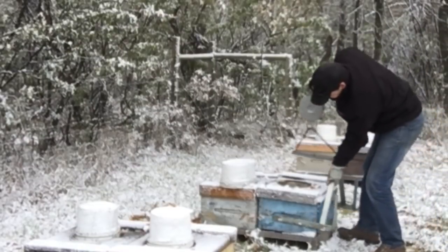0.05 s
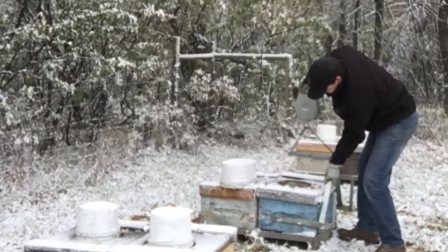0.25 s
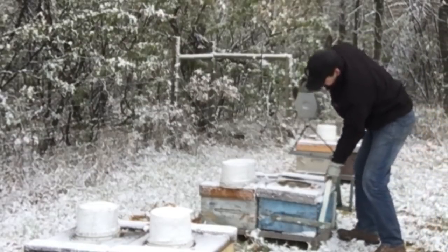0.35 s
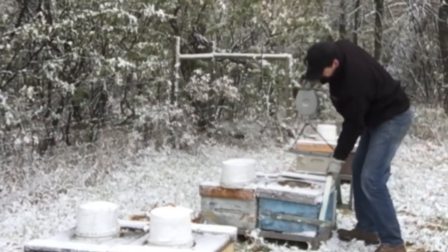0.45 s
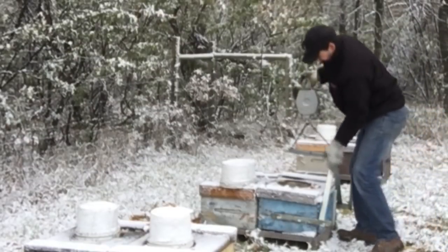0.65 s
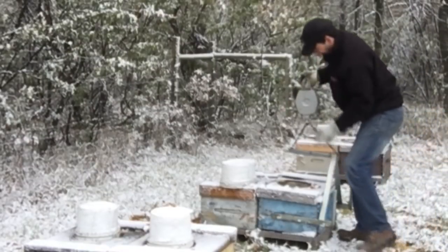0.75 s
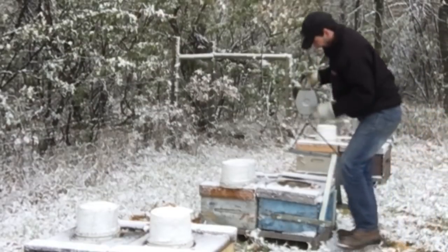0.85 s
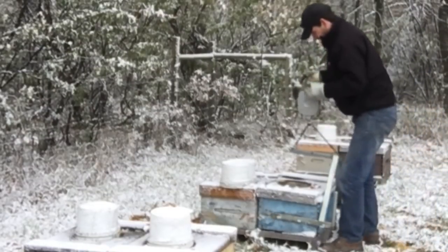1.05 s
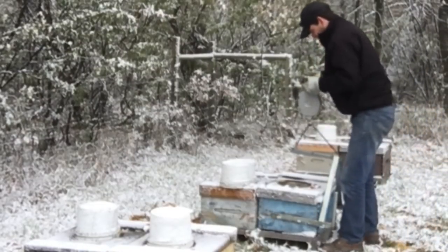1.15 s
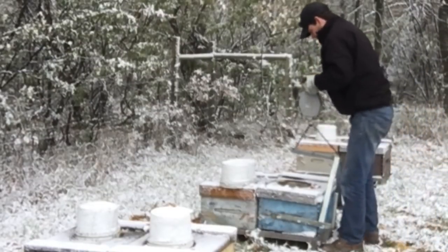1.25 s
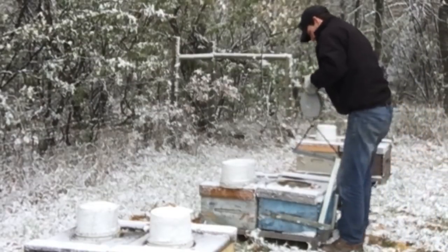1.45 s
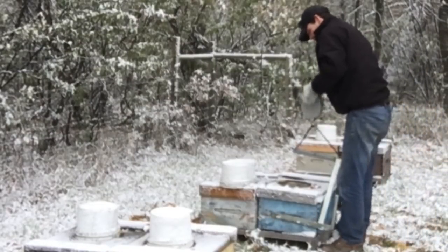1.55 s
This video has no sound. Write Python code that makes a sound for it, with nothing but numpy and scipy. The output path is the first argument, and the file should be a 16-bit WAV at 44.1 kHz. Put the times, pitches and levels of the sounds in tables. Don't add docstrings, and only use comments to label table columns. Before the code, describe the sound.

Bright, short steel clanks come in clusters during the first part, with a scraping hook and hollow knocks, then fade into boot thuds, faint scuffs and jacket rustle over a low, quiet outdoor floor, mono microphone.

```python
import sys
import numpy as np
from scipy import signal
from scipy.io import wavfile

SR = 44100
rng = np.random.default_rng(int(sys.argv[2]) if len(sys.argv) > 2 else 0)


def makeup_ratio(level_db):
    decades = np.asarray(level_db, float) / 20
    return 10 ** decades


def wav_record(signal):
    frames = np.transpose(np.atleast_2d(signal))
    bounded = np.clip(frames, -1, 1)
    quanta = np.round(bounded * 32767).astype(np.int16)
    wavfile.write(sys.argv[1], SR, quanta)


N = 70560
T = np.arange(N) / SR


def at_hz(points, hz):
    point_hz, level_db = np.transpose(points)
    return np.interp(np.log(hz), np.log(point_hz), level_db)


def in_time(rows):
    return np.interp(T, *np.transpose(rows))


def rms_one(x):
    return x / np.sqrt(np.mean(x ** 2) + 1e-20)


def band_pass(x, low_hz, high_hz):
    return signal.sosfilt(signal.butter(2, [low_hz, high_hz], "band", fs=SR, output="sos"), x)


def high_pass(x, order, hz):
    return signal.sosfilt(signal.butter(order, hz, "high", fs=SR, output="sos"), x)


def drift(rate):
    r = np.exp(-2 * np.pi * rate / SR)
    noise = rng.standard_normal(N + SR)
    return rms_one(signal.lfilter([1], [1, -2 * r, r * r], noise)[SR:])


def ring(clicks, hz, t60):
    r = makeup_ratio(-60 / (t60 * SR))
    w = 2 * np.pi * hz / SR
    return signal.lfilter([0, np.sin(w)], [1, -2 * r * np.cos(w), r * r], clicks + 1e-18)


def struck(clicks, hz, t60):
    rise = 4.1 / hz
    return 2 * (1 - makeup_ratio(-60 / (rise * SR))) * ring(ring(clicks, hz, rise), hz, t60)


def bands():
    edges = 25 * 2 ** np.arange(0, 9.7, .4)
    return [(np.sqrt(low * high), signal.butter(2, [low, high], "band", fs=SR, output="sos"))
            for low, high in zip(edges, edges[1:])]


def coloured(spectrum, patchy_db, rate):
    white = rng.standard_normal((2, N + SR))
    together = drift(rate / 4)
    total = np.zeros(N)
    for k, (hz, sos) in enumerate(bands()):
        flicker_db = patchy_db * (0.87 * together + drift(rate))
        total += makeup_ratio(at_hz(spectrum, hz) + flicker_db) * signal.sosfilt(sos, white[k % 2])[SR:]
    return rms_one(total)


def crowd(modes, count=3):
    hz, db, t60 = np.transpose(modes)
    off = np.linspace(-1, 1, count)[:, None] + 0.366 * rng.standard_normal((count, len(hz)))
    all_hz = np.append(hz, hz * (1 + 0.045 * off))
    all_db = np.append(db, np.tile(db, count))
    all_t60 = np.append(t60, np.tile(0.28 * t60, count))
    return np.array([all_hz, all_db, all_t60])[:, np.argsort(all_hz)]


def contacts(s, db, length, per_mode_db, count=6):
    first_touch_db, strike_spread_db = 3.5, 3.5
    later = np.arange(count).clip(0, 1)
    when = (np.arange(count) + (rng.random((len(s), count)) - .5) * later) / count
    at = ((s[:, None] + when * length[:, None]) * SR).astype(int)
    luck = rng.standard_normal((len(s), count, len(per_mode_db)))
    trains = np.zeros((len(per_mode_db), N))
    for k, train in enumerate(trains):
        level_db = (db + per_mode_db[k])[:, None] - first_touch_db * later - 7.5 * when
        level_db = level_db + strike_spread_db * luck[:, :, k] * (1 + later) / 2
        np.add.at(train, at, makeup_ratio(level_db) * np.sign(luck[:, :, k - 1]))
    return trains


# (time [s], level [dB], loudest pitch [Hz], contact length [s], focus [dB per octave])
CLANKS = [(.0013, -20, 3500, 0.0039, 9), (.005, -35, 4640, .01, 12), (.0185, -62, 3400, 0.0072, 27),
          (0.033, -55, 3500, .005, 51), (.0462, -29.5, 4200, 0.0028, 7.5), (.1035, -63, 3560, 0.0093, 15),
          (.2212, -38.5, 5460, 0.0038, 4.5), (0.2262, -22, 3300, .003, 4.5), (0.2293, -43, 11800, .003, 1),
          (.2306, -6, 4600, .0015, 8), (.232, -18, 4800, 0.0044, 9), (0.235, -13, 4300, .007, 10),
          (0.2588, -18, 3920, .0064, 10), (.266, -28.5, 4970, 0.0073, 14.5),
          (0.274, -23, 4650, 0.003, 10.5), (0.278, -31, 3600, 0.0045, 12), (.4491, -13.5, 4760, .001, 10),
          (.4505, -15, 5030, .005, 18), (0.459, -27, 3040, 0.0052, 18), (.5049, -25, 4400, .0012, 6),
          (0.507, -30, 4730, .006, 12.5), (.517, -29.5, 2900, 0.0024, 26), (0.5366, -35.5, 3300, .004, 9),
          (0.543, -46, 7000, .003, 15), (.5817, -33, 3200, .003, 11), (.588, -40, 2980, .002, 7),
          (0.704, -52, 7500, 0.0024, 26.5), (0.723, -45, 4200, .004, 11), (.730, -47.5, 3100, 0.0049, 18),
          (1, -50, 11000, .008, 8.5), (1.082, -46, 4500, .004, 10), (1.311, -50.5, 3050, 0.0048, 11.5)]
# (pitch [Hz], level [dB], t60 [s])
STEEL = [(2716, -9, 0.047), (2890, -2, .02), (3196, -3, .021), (3500, 4, 0.013), (4246, 0.5, .018),
         (4640, -1.5, 0.026), (5277, 0.5, 0.017), (5800, 0.5, .016), (7250, -8, .03), (8000, -8, .02),
         (8800, -4, .012), (11800, -17.5, 0.012), (14400, -16, .015), (15300, -16.5, .015)]
# (time [s], level [dB])
DRAG = [
    (.449, -70),
    (.455, -34),
    (.493, -42),
    (0.498, -34),
    (.52, -37),
    (0.551, -43.5),
    (.572, -52),
    (0.589, -60),
    (0.639, -89.5),
]


def steel():
    s, db, focus_hz, length, focus = np.transpose(CLANKS)
    hz, level_db, t60 = crowd(STEEL)
    away = np.abs(np.log2(hz[:, None] / focus_hz))
    trains = contacts(s, db - 14.5, length, level_db[:, None] - focus * away, count=9)

    slips_per_s, drag_focus_hz = 2500, 4200
    slip_db = in_time(DRAG) + 2 * np.minimum(rng.exponential(1, N), 4.0) - 15.0
    slips = (rng.random(N) < slips_per_s / SR) * makeup_ratio(slip_db)
    slips = slips * ((T > DRAG[0][0]) & (T < DRAG[-1][0]))
    signs = rng.standard_normal((4, N))
    drag_db = level_db - 10 * np.abs(np.log2(hz / drag_focus_hz))

    out = np.zeros(N)
    for k in range(len(hz)):
        clicks = trains[k] + slips * signs[k % 4] * makeup_ratio(drag_db[k])
        out += struck(clicks, hz[k], t60[k])
    return out


# (level [dB], pitch [Hz], length [s])
GRIPPED = [(-32.5, 4450, 0.016), (-42.5, 3450, 0.0032), (-30, 4190, 0.0045), (-22, 3520, 0.0032),
           (-14, 5500, .004), (-16, 3540, 0.0057), (-25.5, 4760, 0.0087), (-22, 5700, 0.006),
           (-22.5, 2880, 0.0023), (-39.5, 1150, 0.0063), (-36.5, 1080, 0.0048), (-35.5, 1050, 0.0073),
           (-43.5, 1150, 0.0051), (-51, 6000, 0.0026)]
GRIPPED_S = [.002, .0185, .0464, .2268, .2312, .2582, .2605, .4495, .4492, .5765, .6528, .662, .676, .7035]


def gripped():
    grip_s, sag_db = .0007, 4
    out = np.zeros(N)
    for s, (db, hz, length) in zip(GRIPPED_S, GRIPPED):
        swell = np.clip((T - s) / grip_s, 0, 1)
        stop = np.clip((s + length - T) / grip_s + 1, 0, 1)
        level = makeup_ratio(db - sag_db * np.clip((T - s) / length, 0, 2))
        out += level * swell * stop * np.sin(2 * np.pi * (hz * T + rng.random()))
    return out


# (level [dB], loudest pitch [Hz], contact length [s], focus [dB per octave])
KNOCKS = [(-38.5, 910, 0.02, 3), (-45, 740, 0.0028, 3.5), (-25.5, 850, .0044, 1.5),
          (-23.5, 930, 0.00442, 10), (-27.5, 830, 0.013, 13), (-31.5, 500, 0.008, 0),
          (-27.5, 2400, .0028, 1), (-34.5, 2700, 0.0032, 5.5), (-27, 1500, 0.00298, 5),
          (-39, 4000, 0.0051, -0.5), (-40, 1600, 0.00368, 3), (-42.5, 2000, 0.00293, 3),
          (-53, 1100, 0.00358, 14), (-50, 1670, 0.0028, 8)]
KNOCK_S = [.002, .063, .2293, .4488, .500, .536, .5764, .583, .6527, .659, .6635, .6765, .692, .709]
# (pitch [Hz], level [dB], t60 [s])
HOUSING = [(630, -5, .025), (800, -5, .02), (1000, -2, .04), (1190, -2, .03), (1660, -8, .02),
           (2050, -7, .018), (2570, -5, .02), (3080, -5, .02), (3390, -6, .02), (4370, -10, .018),
           (5200, -12, .015), (6200, -16, .012), (7500, -19, .012), (11000, -24, .01)]


def housing():
    db, focus_hz, length, focus = np.transpose(KNOCKS)
    hz, level_db, t60 = crowd(HOUSING, count=2)
    away = np.abs(np.log2(hz[:, None] / focus_hz))
    trains = contacts(np.array(KNOCK_S), db - 9.5, length, level_db[:, None] - focus * away)
    return sum(struck(trains[k], hz[k], t60[k]) for k in range(len(hz)))


# (level [dB], low edge [Hz], high edge [Hz], t60 [s])
SHAKES = [(-50, 3300, 15500, 0.1), (-28, 7000, 15800, 0.086), (-27, 187, 1900, 0.092),
          (-38, 6800, 15800, 0.043), (-37, 496, 2400, 0.07), (-40.5, 2400, 10000, 0.13),
          (-52, 3100, 12000, 0.18), (-52, 5100, 15400, 0.036), (-50, 2000, 15500, .12),
          (-58, 4300, 15500, 0.077), (-52, 8900, 18000, .03), (-68, 4500, 17600, 0.025),
          (-61.5, 5200, 15000, 0.034), (-46, 1800, 8900, 0.062), (-46.5, 1760, 5500, 0.067)]
SHAKE_S = [.0015, .2294, .229, .4490, .4495, .258, .46, .496, .505, .546, .5762, .6522, .722, .576, .6524]


def shakes():
    out = np.zeros(N)
    grit = rng.standard_normal(N) * makeup_ratio(3 * drift(300))
    for s, (db, low_hz, high_hz, t60) in zip(SHAKE_S, SHAKES):
        burst = grit * (T > s) * makeup_ratio(db - 60 * np.clip(T - s, 0, 1) / t60)
        out += band_pass(burst + 1e-18, low_hz, high_hz) * np.sqrt(SR / 2 / (high_hz - low_hz))
    return out


# (time [s], level [dB], pitch [Hz], t60 [s])
THUDS = [(.003, -47.5, 333, 0.082), (0.079, -47.5, 72.4, 0.37), (0.0915, -36, 447, 0.013),
         (0.107, -39.5, 344, 0.014), (0.156, -46.5, 355, 0.028), (0.181, -41, 69, 0.11),
         (0.235, -42.5, 147, 0.16), (0.242, -27, 293, 0.057), (0.284, -43.5, 192, 0.027),
         (0.392, -51.5, 275, 0.096), (0.458, -32, 326, 0.019), (0.499, -32, 350, 0.044),
         (.512, -38, 202, 0.085), (0.584, -44, 380, 0.053), (0.661, -50, 320, 0.061),
         (.727, -38, 366, 0.018), (0.744, -52, 133.7, 0.086), (0.906, -51.5, 354, .03),
         (1.0933, -33.5, 164, 0.044), (1.283, -47, 525, .02), (1.318, -53, 604, .04),
         (1.473, -46, 434, 0.013), (1.577, -49.5, 115, 0.12)]


def thuds():
    out = np.zeros(N)
    for s, db, hz, t60 in THUDS:
        push = np.zeros(N)
        push[int(s * SR)] = makeup_ratio(db)
        out += ring(push, hz, t60) + 0.13 * ring(push, 0.82 * hz, 0.53 * t60)
    return out


# (time [s], level [dB], upper edge [Hz], length [s])
SCUFFS = [
    (0.0915, -45.5, 1020, 0.003),
    (0.885, -61, 2330, 0.039),
    (1.079, -60, 1500, 0.016),
    (1.115, -54, 335, 0.025),
    (1.277, -63, 1490, 0.019),
    (1.312, -61, 1503, 0.032),
    (1.465, -58, 1200, 0.019),
    (0.721, -50.5, 1283, 0.015),
]


def scuffs():
    out = np.zeros(N)
    grit = rng.standard_normal(N) * makeup_ratio(2.9 * drift(210))
    for s, db, top_hz, length in SCUFFS:
        phase = np.clip((T - s) / length, 0, 1)
        crunch = rms_one(band_pass(grit, 0.21 * top_hz, top_hz))
        out += makeup_ratio(db) * crunch * np.sin(np.pi * np.sqrt(phase))
    return out


# (time [s], level [dB])
RUSTLE = [(0, -53.5), (.13, -76), (.152, -93), (.19, -63), (.75, -66), (.87, -70), (.95, -75.5),
          (1.04, -72), (1.085, -59.5), (1.15, -63), (1.17, -78.5), (1.31, -79), (1.35, -62), (1.44, -65.5),
          (1.5, -66), (1.56, -69.5), (1.6, -77.5)]
# (pitch [Hz], level [dB])
CLOTH = [(1500, -13.5), (3000, -5), (6500, -4), (9000, -16.5), (12500, -9), (16000, -55.5)]


def rustle():
    bright = high_pass(coloured(CLOTH, patchy_db=3.5, rate=30), 2, 1800)
    return makeup_ratio(in_time(RUSTLE)) * rms_one(bright)


# (pitch [Hz], t60 [s])
SCATTER = [(300, 0.75), (1200, 0.29), (3500, 0.28), (7000, 0.18), (14000, 0.094)]


def scatter(x):
    t = np.arange(SR // 2) / SR
    white = rng.standard_normal((2, len(t)))
    tail = np.zeros(len(t))
    for k, (hz, sos) in enumerate(bands()):
        tail += signal.sosfilt(sos, white[k % 2]) * makeup_ratio(-60 * t / at_hz(SCATTER, hz))
    tail = tail * (1 - np.exp(-t / 0.0027))
    return makeup_ratio(-11.5) * signal.fftconvolve(x, tail / np.sqrt(np.sum(tail ** 2)))[:N]


# (pitch [Hz], level [dB])
FLOOR = [(25, -8.5), (110, -2.5), (220, -6.5), (600, -12.5), (1700, -20), (3200, -20.5), (6500, -27.5),
         (9000, -34.5), (16000, -36.5)]


def outdoor_floor():
    return makeup_ratio(-60.5) * coloured(FLOOR, patchy_db=0.6, rate=12)


def rumble():
    centre_hz, width_hz = 55.93, 16
    drone = ring(rng.standard_normal(N + SR), centre_hz, 1.9 / width_hz)[SR:]
    return makeup_ratio(-64) * rms_one(drone)


def scene():
    hits, rings = steel() + housing(), gripped()
    echo = scatter(hits + 0.4 * rings)
    handling = shakes() + thuds() + scuffs() + rustle()
    background = outdoor_floor() + rumble()
    return (hits + rings + echo + handling + background)[None]


def band_limit(x):
    return signal.sosfilt(signal.butter(12, 16640, fs=SR, output="sos"), x)


def record(dry):
    limit, low_cut_hz, top_cut_hz = .85, 44.4, 16200
    rounded = limit * np.tanh(dry / limit)
    thinned = high_pass(rounded, 4, low_cut_hz)
    top_cut = signal.cheby2(10, 30, top_cut_hz, fs=SR, output="sos")
    return band_limit(signal.sosfilt(top_cut, thinned))


dry = scene()
out = record(dry)
wav_record(out)
```